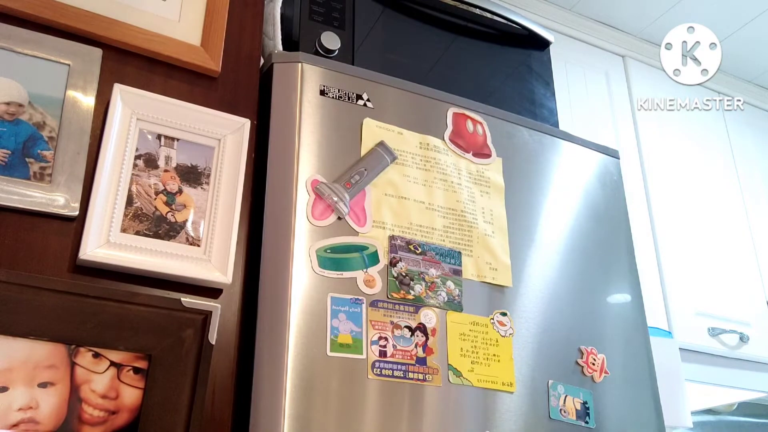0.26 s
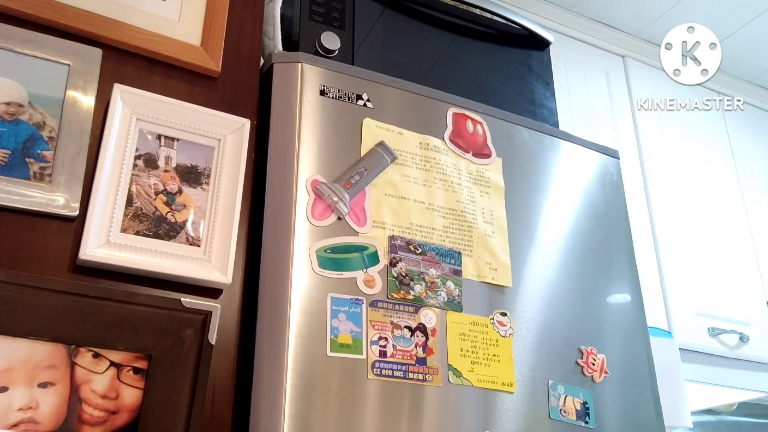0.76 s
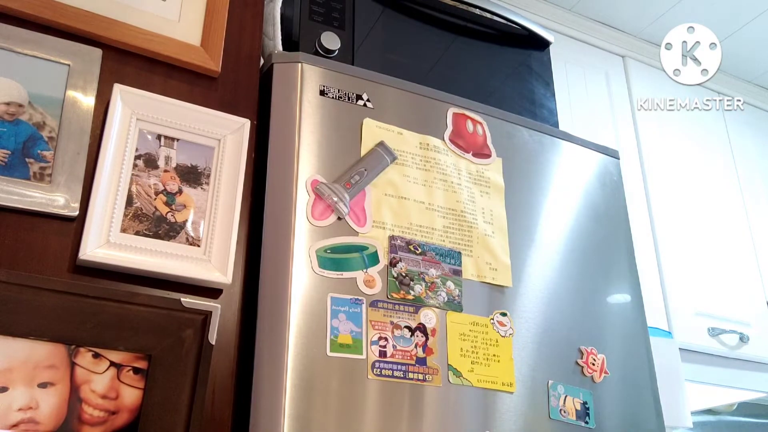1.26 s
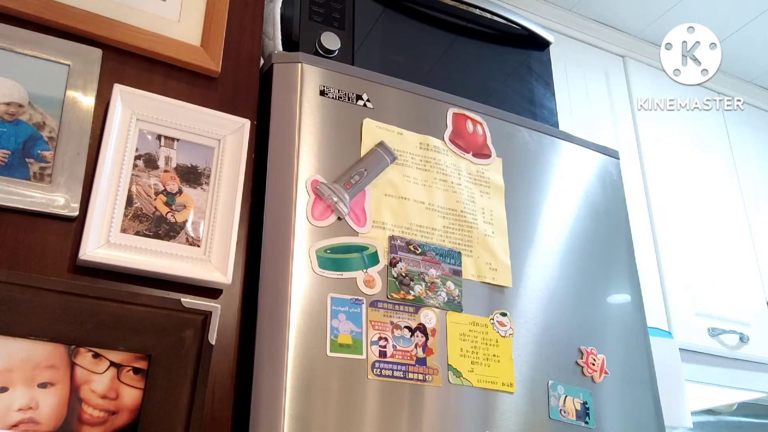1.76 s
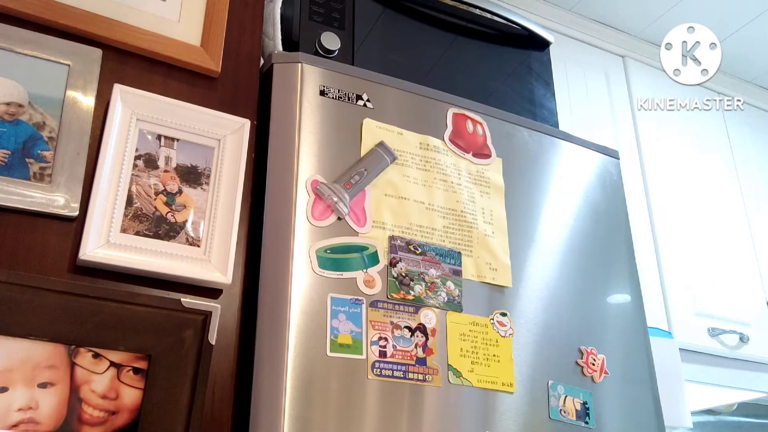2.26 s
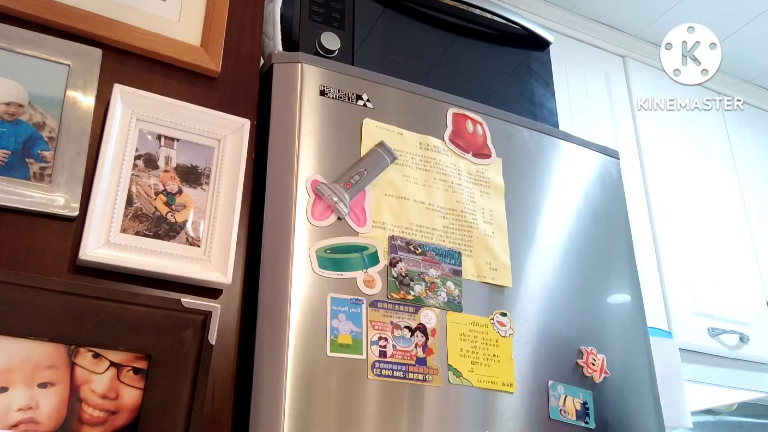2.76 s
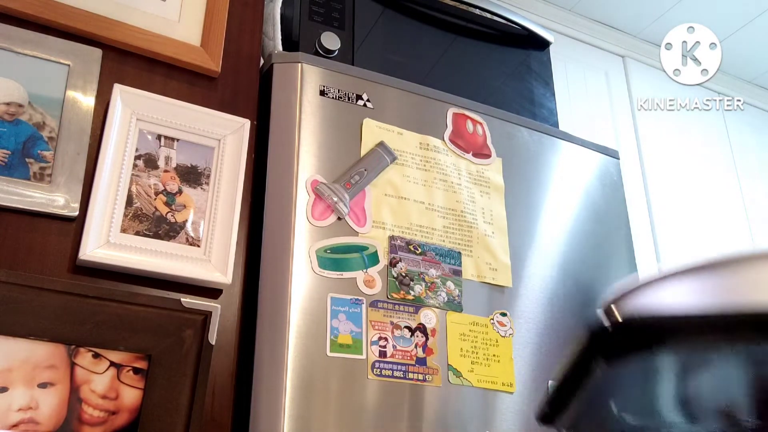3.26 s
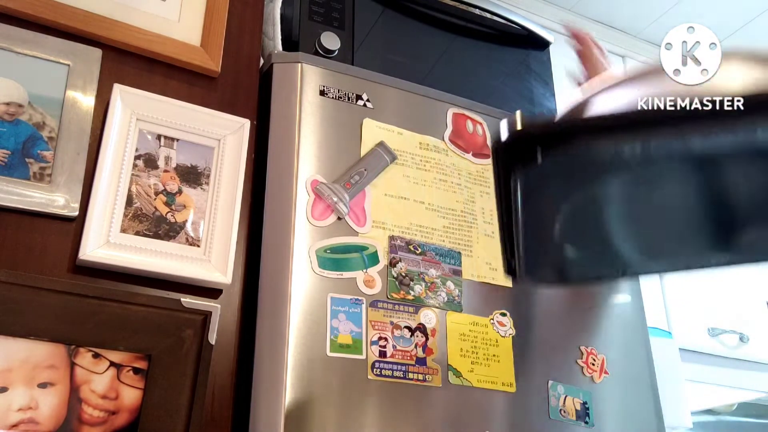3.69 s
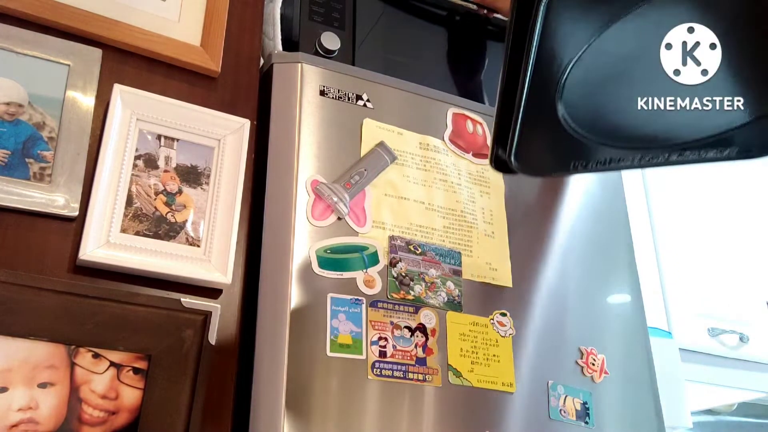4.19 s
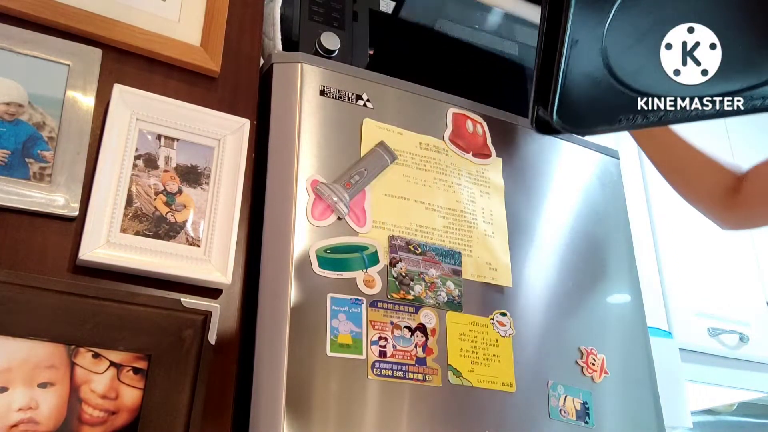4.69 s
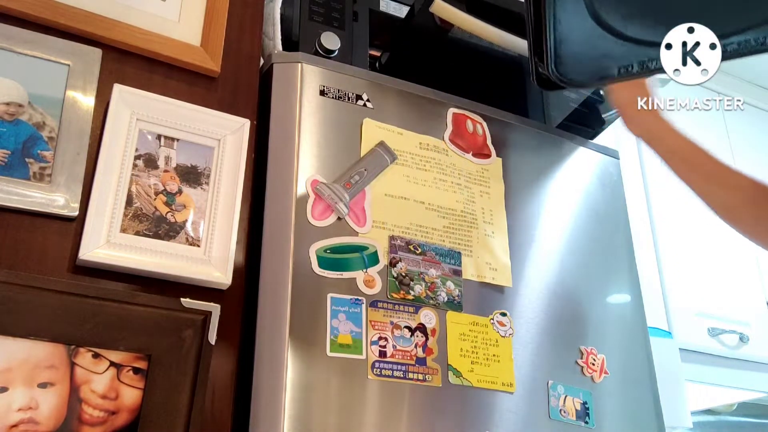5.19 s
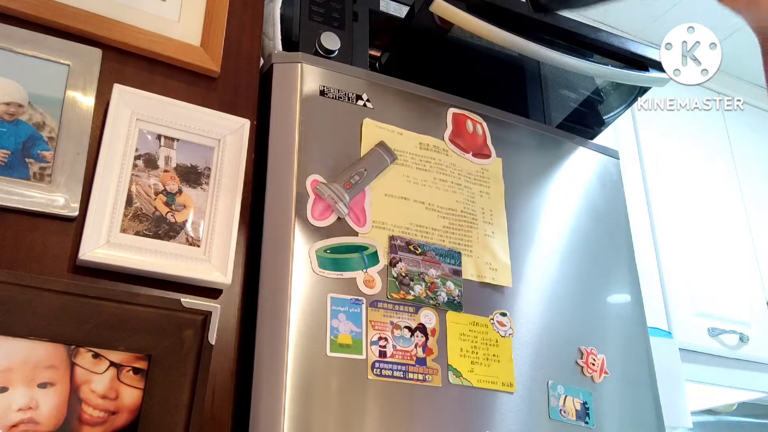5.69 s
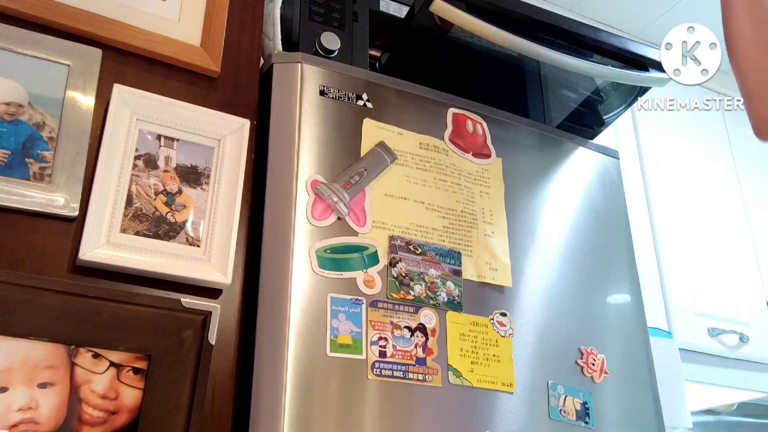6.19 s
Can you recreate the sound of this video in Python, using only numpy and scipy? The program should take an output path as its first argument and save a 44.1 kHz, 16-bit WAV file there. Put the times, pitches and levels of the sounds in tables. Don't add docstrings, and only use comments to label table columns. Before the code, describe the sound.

A small hard-walled kitchen heard in close stereo, with low building rumble and a very faint refrigerator hum throughout. Cloth rustles softly in the first half second. Around 0.65 s come light, quick metallic bumps and a tick, then scuffing and tiny rack taps to 1.5 s. At 1.7 s the oven door is struck hard, a dry, damped sheet-metal bang with rapid rebounds to about 1.85 s. After a hissy rub, a pan lands loudly at 2.03 s and clatters for around a tenth of a second. Light taps come at 2.6 s amid rustling. At 3.43 s a tray is set down with a softer knock and brief settling, then small ticks. A brisk rub at 3.85 s precedes clustered rack knocks and clicks from 4.1 to 4.45 s. Only very faint taps follow around 5.1 to 5.35 s, then near quiet. Echoes are short and bright.

```python
import sys
import numpy as np
from scipy import signal
from scipy.fft import rfft, irfft, next_fast_len
from scipy.io import wavfile

SR = 44100
rng = np.random.default_rng(int(sys.argv[2]) if len(sys.argv) > 2 else 0)


def bounce(signal):
    frames = np.transpose(np.atleast_2d(signal))
    limited = np.clip(frames, -1, 1)
    pcm = np.round(limited * 32767).astype(np.int16)
    wavfile.write(sys.argv[1], SR, pcm)


def gain_from_db(level_db):
    decades = np.asarray(level_db, float) / 20
    return 10 ** decades


N = 284430


def knocks():
    # f/Hz, level/dB, t60/s
    cabinet_modes = [(169.4, 1, .06), (238, 0.4, .07)]
    # t/s, left port ahead/ms
    cook_path = [
        (4.15, .23),
        (4.4, .02),
        (5.2, -.2),
    ]
    # t/s, level/dB, left port ahead/ms
    tick_events = [(.672, -33.5, 0.37), (1.2476, -56, .4), (1.3902, -44.5, -.1), (3.575, -32.5, 0.053),
                   (3.591, -32, -0.34), (4.224, -34.5, -.4), (4.2445, -30.5, -.3), (4.2764, -39, -0.15),
                   (4.3006, -43, -0.14), (4.32, -47, 0.31), (5.135, -51, -0.106), (5.259, -61, 0.33),
                   (5.346, -48.5, -.25)]
    thump_db, thump_hz, tick_chatter_s = -8.5, 120, 0.011

    out, echoes = np.zeros((2, N)), kitchen()
    cycles = np.arange(SR // 12) / SR * thump_hz
    thump = gain_from_db(thump_db) * np.sin(2 * np.pi * cycles) * np.exp(-cycles / 0.74)
    for s, db, thud_db, crack_db, modes, push_db, dull, chatter_s in runs():
        force = contact(chatter_s, size=SR // 12)
        thud = ring(force, cabinet_modes) + thump
        body = ring(force, modes) + gain_from_db(push_db) * push(force) + gain_from_db(thud_db) * thud
        sound = gain_from_db(db) * (body + gain_from_db(crack_db) * crack(force, dull))
        ahead_ms = np.interp(s, *np.transpose(cook_path))
        add(out, sound, s, ahead_ms, echoes())
    for s, db, ahead_ms in tick_events:
        tick = crack(contact(tick_chatter_s, size=SR // 16), dull=0.26)
        add(out, gain_from_db(db + 3.5) * tick, s, ahead_ms, echoes())
    return out


def runs():
    # f/Hz, level/dB, t60/s
    door_modes = [(320, -11, 0.0076), (512, -2.5, 0.021), (670, -2, 0.011), (800, -5, 0.012),
                  (917, -3, 0.026), (1100, 2.5, 0.0095), (1250, 0, 0.035), (1570, 1, 0.0038),
                  (1510, -11, 0.011), (1833, -2, 0.021), (2240, -2, 0.0096), (3180, -9, 0.0064)]
    rebound_modes = [(305, -10, 0.021), (485, 0.5, 0.02), (660, 0, 0.01), (923, -1, 0.033),
                     (1115, -1, 0.022), (1334, 2.5, 0.0093), (1690, -6, 0.012), (2480, 0.5, 0.0035)]
    pan_modes = [(243, -12.5, 0.045), (427, -19, 0.0052), (657, -8, 0.014), (740, -6, 0.037),
                 (822, -3, 0.011), (962, -0.5, 0.025), (1086, -0.5, 0.013), (1206, 0.5, 0.023),
                 (1310, -1, 0.012), (1460, -5.5, 0.02), (1920, -0.5, 0.0052), (3270, -14.5, .006)]
    bump_modes = [(416, -7, 0.021), (623, 2, 0.014), (760, -2, 0.022), (960, 0, 0.024), (1036, -3, 0.025),
                  (1295, -6, 0.018), (1910, -11, 0.011), (2450, -14.5, 0.0089)]
    tray_modes = [(426, -9, 0.036), (550, -3.5, 0.018), (730, -3, 0.014), (850, -2, 0.016), (1050, -8, .02),
                  (1212, -3.5, 0.017), (1370, -2, .015), (1480, -11.5, .012), (1780, -16, .008)]
    rack_modes = [(410, -5, 0.011), (572, -2, 0.035), (733, 1.5, 0.008), (970, 3, 0.014), (1360, 0, 0.0095),
                  (1950, 0, 0.0063), (2900, -1, 0.0047)]
    # t/s, first ring level/dB, loss per touch/dB, first gap/s
    blow_events = [
        (.637, -32, 2, .011),
        (.658, -25, -1.5, .0068),
        (.697, -31.5, 14, .016),
        (1.69, -6, 0.96, .005),
        (1.738, -25.5, -3, .017),
        (1.7743, -12, 2.5, .0085),
        (2.0296, -13, 0, .005),
        (2.0342, -4, 4, .0065),
        (3.431, -18.5, 9.5, .005),
        (3.453, -30, 3, .011),
    ]
    touch_counts = [2, 4, 3, 5, 2, 7, 1, 9, 3, 4]
    struck_bodies = ["bump", "bump", "bump", "door", "door", "rebound", "pan", "pan", "tray", "tray"]
    first_cracks_db = [-2.5, -18, -26, -0.5, 5, -2.5, 2, -6, -11, -13]
    # t/s, ring level/dB, thud re ring/dB, crack re ring/dB
    rack_knocks = [(1.008, -44, -24, -21), (1.5, -31, -9.5, -4), (1.519, -38, -21, -3),
                   (2.61, -38.5, -4.5, 0), (2.63, -39, -10, -14), (2.657, -52.5, 3, 3),
                   (4.099, -32.5, -0.5, -14.5), (4.110, -29, -4.5, 5), (4.126, -40.5, 1.5, -13),
                   (4.269, -30.5, -18.5, 1.5), (4.3759, -29.5, -20, 9.5), (4.391, -28.5, -26, 2),
                   (4.405, -37, -9, -9), (4.44, -39.5, -2.5, -11), (4.66, -50.5, -22, -16),
                   (5.14, -46, -5, -17), (5.201, -49.5, -0.5, -18), (5.295, -46.5, -17, 2),
                   (5.331, -46.5, -20, 11)]
    gap_growth, crack_loss_db, thud_gain_db, uneven_db = 1.15, -0.5, 1.35, 0.5
    first_push_db, rack_chatter_s = 3.5, 0.0097

    bodies = dict(
        door=(door_modes, -4, -16, .4, .007),
        rebound=(rebound_modes, -2, -21, .3, .013),
        pan=(pan_modes, -5, -19, .8, .008),
        bump=(bump_modes, -9, -24, .3, .011),
        tray=(tray_modes, -4, -16, .75, .007))
    for blow, count, name, crack_db in zip(blow_events, touch_counts, struck_bodies, first_cracks_db):
        s, db, loss_db, gap_s = blow
        modes, push_db, thud_db, dull, chatter_s = bodies[name]
        for k, luck in enumerate(rng.standard_normal(count)):
            ring_db = db - loss_db * k + uneven_db * luck
            yield (s, ring_db, thud_db + thud_gain_db * k, crack_db - crack_loss_db * k,
                   modes, push_db + first_push_db * (k == 0), dull, chatter_s)
            s = s + gap_s * gap_growth ** k
    for row in rack_knocks:
        yield (*row, rack_modes, -4, .2, rack_chatter_s)


def contact(chatter_s, size):
    t = np.arange(size) / SR
    touch = rng.random(size) < 1200 / SR
    strength = rng.standard_normal(size)
    force = .3 * touch * strength * np.exp(-(t / chatter_s) ** 3)
    force[0] = 1
    return force + 1e-18


def ring(force, modes):
    longest_ring_s, spread_db, pitch_bend = .03, 1.5, .035
    out = 0
    chance = rng.standard_normal((len(modes), 2))
    for k, ((hz, db, t60), (luck, bend)) in enumerate(zip(modes, chance)):
        r = gain_from_db(-60 / (min(t60, longest_ring_s) * SR))
        w = 2 * np.pi * hz * (1 + pitch_bend * bend) / SR
        gain = (-1) ** k * gain_from_db(db + spread_db * luck)
        out = out + gain * signal.lfilter([0, np.sin(w)], [1, -2 * r * np.cos(w), r * r], force)
    out = signal.sosfilt(signal.butter(5, 140, "high", fs=SR, output="sos"), out)
    return out / np.max(np.abs(out))


def push(force):
    first = force * (np.arange(len(force)) == 0)
    swing = signal.sosfilt(signal.butter(2, [260, 1000], "band", fs=SR, output="sos"), first)
    return swing / np.max(np.abs(swing))


def crack(force, dull):
    spray = signal.lfilter([1], [1, -.965], np.abs(force)) * rng.standard_normal(len(force))
    bright = signal.sosfilt(signal.butter(2, 2200, "high", fs=SR, output="sos"), spray)
    bright = signal.lfilter([1], [1, -dull], bright)
    return bright / np.max(np.abs(bright))


def kitchen():
    # f/Hz, t60/s
    room_decay = [(100, 0.11), (300, 0.31), (1000, 0.36), (3000, 0.46), (7000, 0.28), (12000, 0.033)]
    room_db, first_echo_s, early_db, early_t60_s = -1, .003, 6, 0.093
    size = SR // 3
    t = np.arange(size) / SR
    air = diffuse([(20, 0), (20000, 0)], size=3 * size)
    edges_hz = 60 * 2 ** np.arange(0, 8.1, .8)
    bands = np.array([signal.sosfilt(signal.butter(1, pair, "band", fs=SR, output="sos"), air)
                      for pair in zip(edges_hz, edges_hz[1:])])
    centres_hz = np.sqrt(edges_hz[:-1] * edges_hz[1:])
    decay = gain_from_db(-60 * t / at_hz(room_decay, centres_hz)[:, None])
    onset = 1 - np.exp(-(t / first_echo_s) ** 2)
    near_walls = 1 + gain_from_db(early_db - 60 * t / early_t60_s)
    decay = decay * onset * near_walls

    def echoes():
        i = rng.integers(2 * size)
        tail = np.sum(bands[:, :, i:i + size] * decay[:, None], axis=0)
        return gain_from_db(room_db) * tail / np.sqrt(np.sum(tail ** 2) / 2)
    return echoes


def add(out, sound, s, ahead_ms, room):
    flight_s, echo_shared, left_db = .0004, 0.12, 1.14
    left, right = signal.fftconvolve(sound[None], room, axes=1)
    right = echo_shared * left + np.sqrt(1 - echo_shared ** 2) * right
    for row, echo in enumerate((left, right)):
        i = round((s + flight_s + row * ahead_ms / 1000) * SR)
        echo[:len(sound)] += sound
        out[row, i:i + len(echo)] += gain_from_db(-row * left_db) * echo[:N - i]


def rubbing():
    # f/Hz, level/dB per Hz
    hiss_colour = [(2500, -30), (4500, -3), (7000, 0), (9700, 0), (14500, -7)]
    scuff_colour = [(700, -21), (1300, -4), (2500, 0.5), (4500, -4.5), (8000, -23.5)]
    handling_colour = [(100, -18), (200, 2), (600, -4), (1200, -3), (2500, -41)]
    # peak t/s, hiss level/dB, rise/(dB/s),
    # fall/(dB/s), scuff re hiss/dB
    strokes = [(0.0, -53.5, 50, 62, -8.5), (.16, -43.5, 141, 40, -9.5), (.7, -54.5, 40, 60, -4.5),
               (.87, -48.5, 232, 75, -7), (1.389, -56, 122, 22, -4), (1.53, -49.5, 300, 56, -3.5),
               (1.59, -47, 100, 87, -19), (1.97, -39, 116, 127, -13.5), (2.3, -47.5, 10, 27, -9.5),
               (2.534, -43, 141, 150, -13), (2.62, -56, 150, 80, -8), (2.8, -56, 53, 44, 1),
               (2.99, -44, 50, 55, -11), (3.25, -54, 40, 27, -9.5), (3.52, -51.5, 62, 41, -9.5),
               (3.6, -47, 200, 90, -13), (3.75, -56.5, 40, 40, -9), (3.85, -38.5, 222, 67, -7),
               (3.96, -44, 62, 119, -8), (4.13, -49, 99, 40, -5.5), (4.316, -40, 128, 160, -8.5),
               (4.43, -53, 60, 42, -7), (4.68, -58.5, 22, 88, -7),
               (5.03, -77, 150.4, 150, -10), (5.134, -62, 600, 250, -17), (5.27, -62, 500, 80, -14),
                     (5.37, -62, 100, 110, -4.5), (5.52, -62, 300, 130, -10), (5.67, -64, 500, 500, -2),
                     (6.05, -65, 90, 150, -4), (6.32, -60, 100, 25, -6.5)]
    # peak t/s, rumble level/dB
    grips = [(.63, -50), (.88, -53), (1.39, -53.5), (1.66, -52), (1.92, -44.5), (2.61, -54), (2.99, -56),
             (3.96, -55), (4.246, -51)]
    grip_rise_db_s, grip_fall_db_s = 176, 148

    s, hiss_db, rise, fall, scuff_db = np.transpose(strokes)
    slopes = rise[:, None], fall[:, None]
    layers = ((hiss_colour, swells(s, hiss_db - 4.5, *slopes)),
              (scuff_colour, swells(s, hiss_db + scuff_db, *slopes)),
              (handling_colour, swells(*np.transpose(grips), grip_rise_db_s, grip_fall_db_s)))
    return sum(gain * gain_from_db(1.0 * drift(65)) * diffuse(colour) for colour, gain in layers)


def swells(s, db, rise_db_s, fall_db_s):
    late_s = np.arange(0, N, 64) / SR - s[:, None]
    slope = np.where(late_s < 0, rise_db_s, -fall_db_s)
    gain = np.sqrt(np.sum(gain_from_db(db[:, None] + slope * late_s) ** 2, axis=0))
    return np.interp(np.arange(N), np.arange(0, N, 64), gain)


def house():
    # f/Hz, level/dB per Hz
    house_colour = [(15, -0.5), (30, -2), (42, 0), (62, -13.5), (85, -11.5), (140, -10), (290, -7.5),
                    (450, -15.5), (900, -19), (2000, -28), (5000, -38.5), (9000, -39.5), (14500, -38.5)]
    house_db, hum_db, hum_hz = -51, -63, 100.3
    hum = gain_from_db(hum_db + 3.0 * drift(6.6)) * np.sin(2 * np.pi * hum_hz * np.arange(N) / SR)
    rumble = gain_from_db(house_db + 0.1 * drift(3.84)) * diffuse(house_colour, own_below_hz=49)
    return rumble + hum


def diffuse(spectrum, size=N, own_below_hz=0):
    port_gap_m, sound_m_s = .135, 343
    padded = next_fast_len(size, real=True)
    hz = np.fft.rfftfreq(padded, 1 / SR)
    own_bass = np.clip(1 - own_below_hz / (hz + 60), 0, 1)
    alike = np.sinc(2 * hz * port_gap_m / sound_m_s) * own_bass
    mid, side = rfft(rng.standard_normal((2, padded)))
    pair = np.sqrt(1 + alike) * mid + np.sqrt(1 - alike) * side * [[1], [-1]]
    return rms_one(irfft(pair * gain_from_db(at_hz(spectrum, hz)), padded)[:, :size])


def drift(rate_hz):
    steps = rng.standard_normal(2000)
    return rms_one(np.interp(np.arange(N) / SR * rate_hz, np.arange(len(steps)), steps))


def at_hz(points, hz):
    table_hz, value = np.transpose(points)
    return np.interp(np.log(hz + 1), np.log(table_hz), value)


def rms_one(x):
    return x / np.sqrt(np.mean(x ** 2) + 1e-20)


def scene():
    return knocks() + rubbing() + house()


def low_pass(x):
    return signal.sosfilt(signal.butter(12, 15430, fs=SR, output="sos"), x)


def record(dry):
    # f/Hz, width/Hz, lift/dB
    port_resonances = [(10750, 1150, 13), (8750, 1050, 12.5)]
    cut_hz = 14230
    out = []
    for x, (hz, width_hz, lift_db) in zip(dry, port_resonances):
        r, w = np.exp(-np.pi * width_hz / SR), 2 * np.pi * hz / SR
        b = (1 - r * r) / 2 * np.array([1, 0, -1])
        peak = signal.lfilter(b, [1, -2 * r * np.cos(w), r * r], x)
        out.append(x + (gain_from_db(lift_db) - 1) * peak)
    rounded = np.tanh(np.array(out))
    mix = signal.sosfilt(signal.ellip(10, .5, 50, cut_hz, fs=SR, output="sos"), rounded)
    return low_pass(mix)


dry = scene()
out = record(dry)
bounce(out)
```